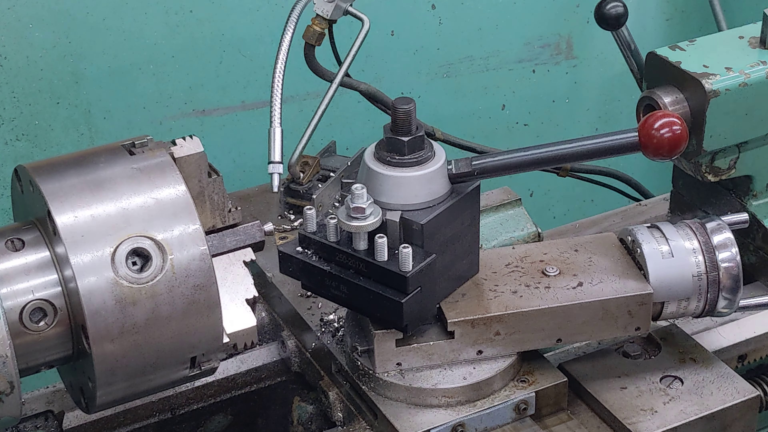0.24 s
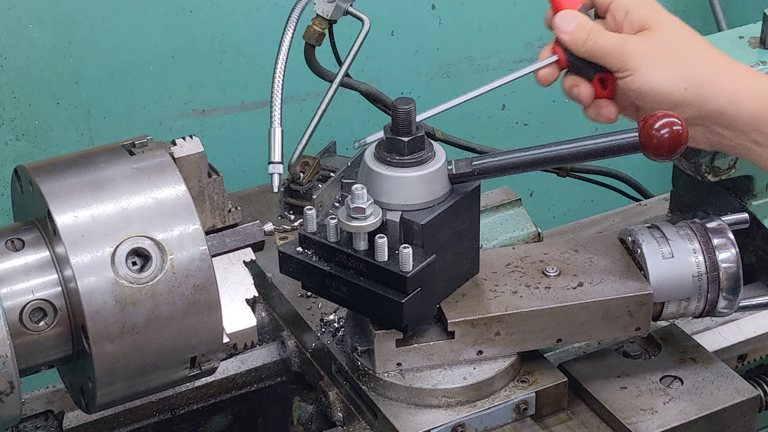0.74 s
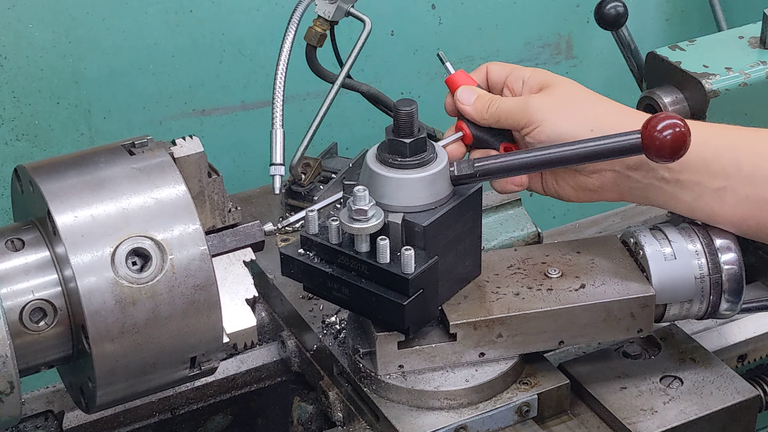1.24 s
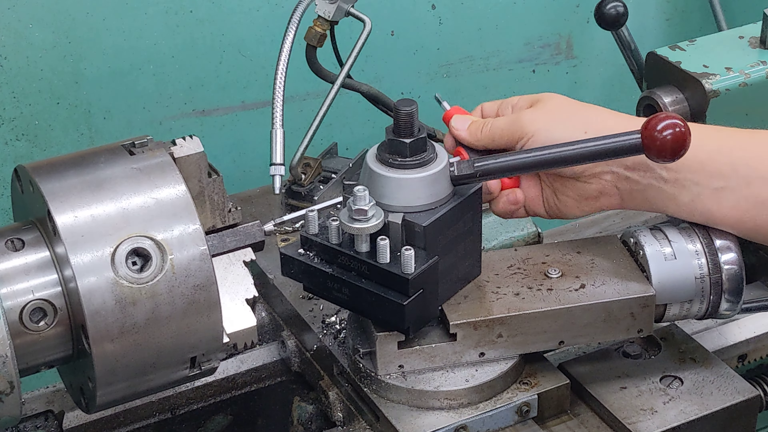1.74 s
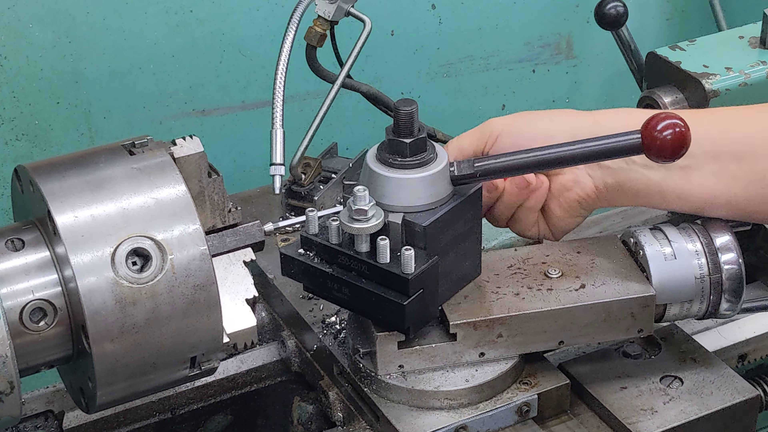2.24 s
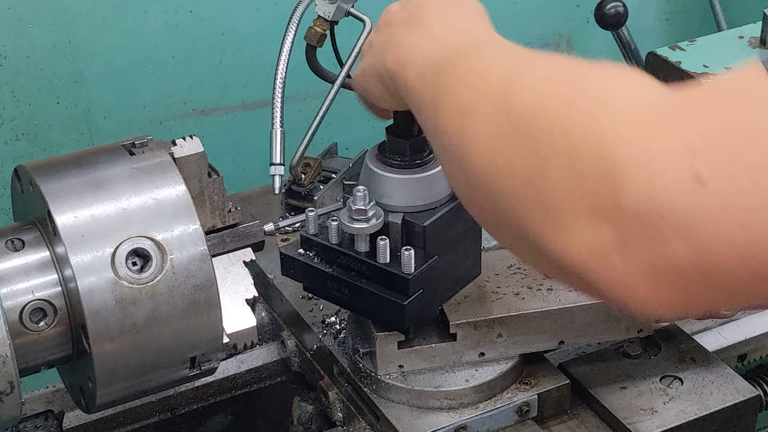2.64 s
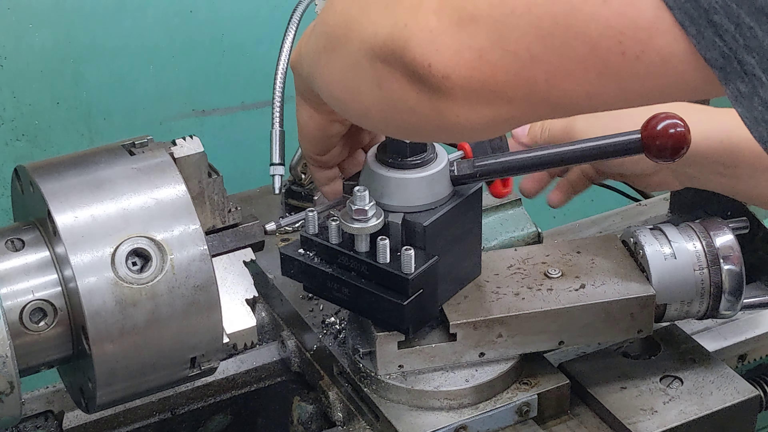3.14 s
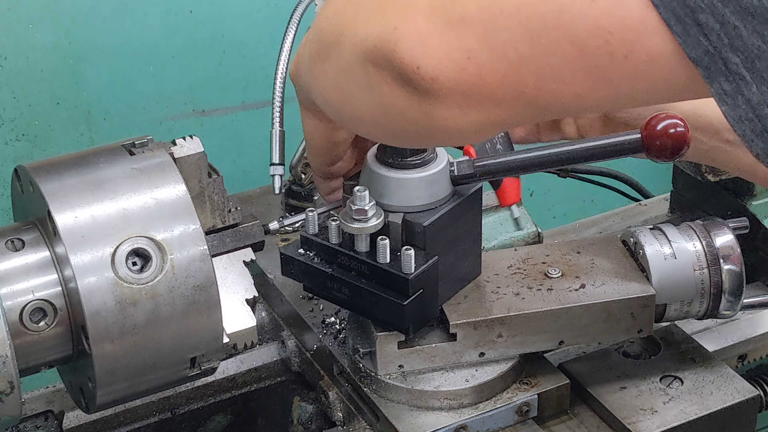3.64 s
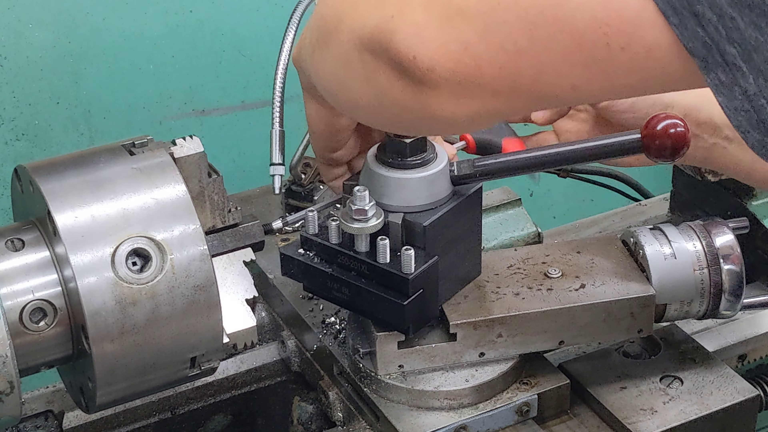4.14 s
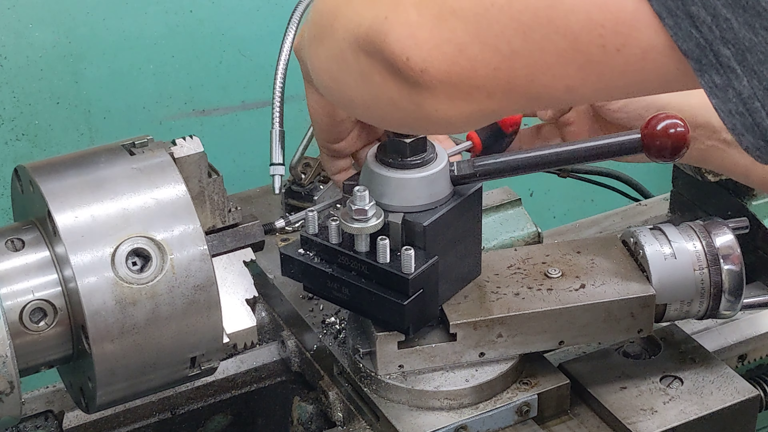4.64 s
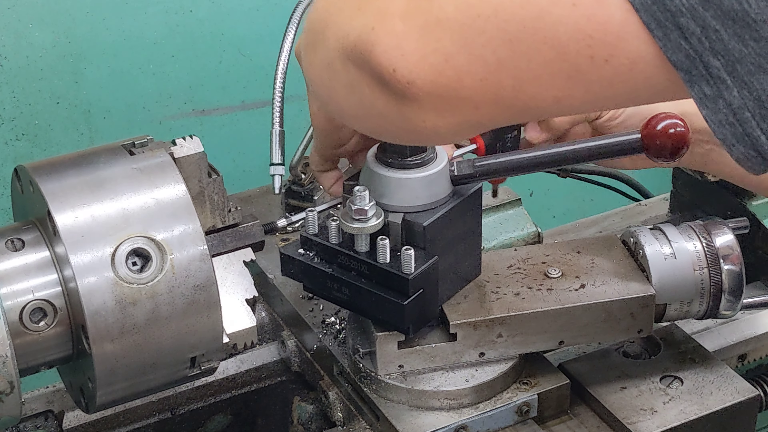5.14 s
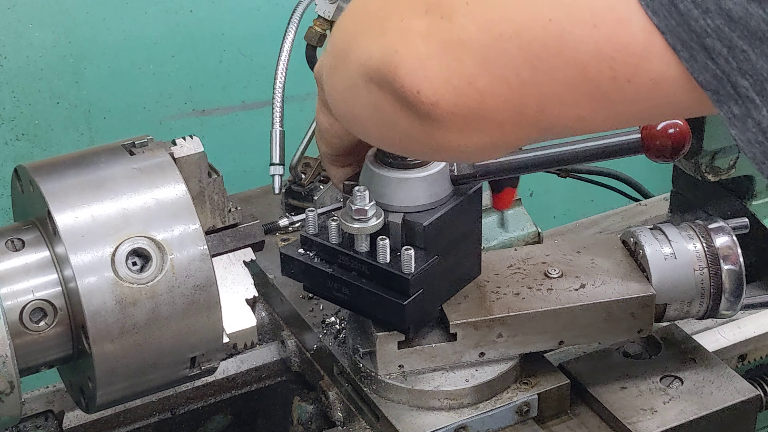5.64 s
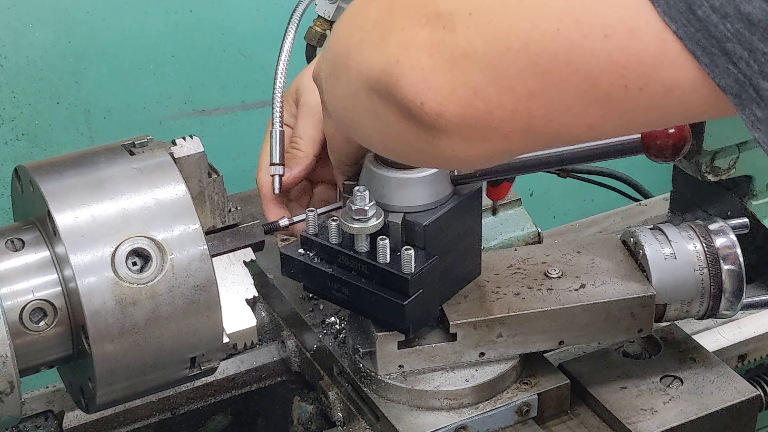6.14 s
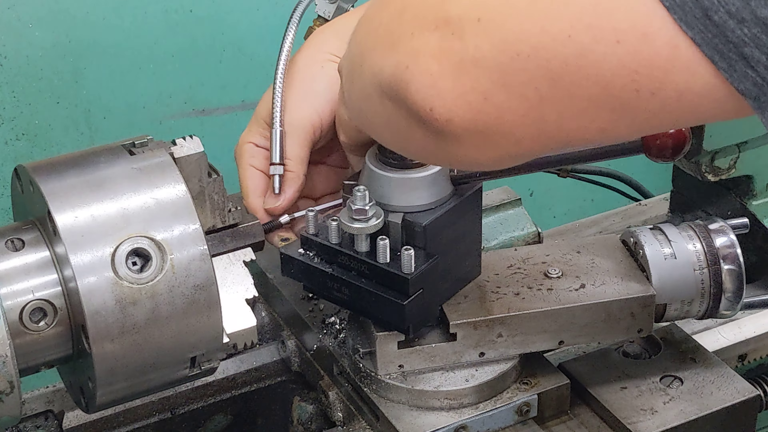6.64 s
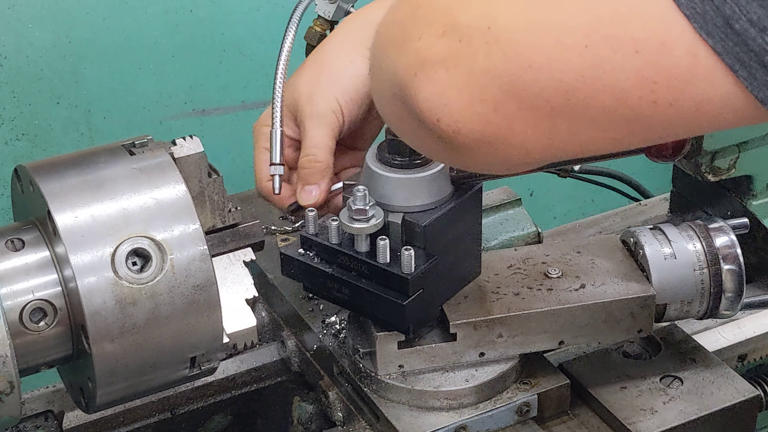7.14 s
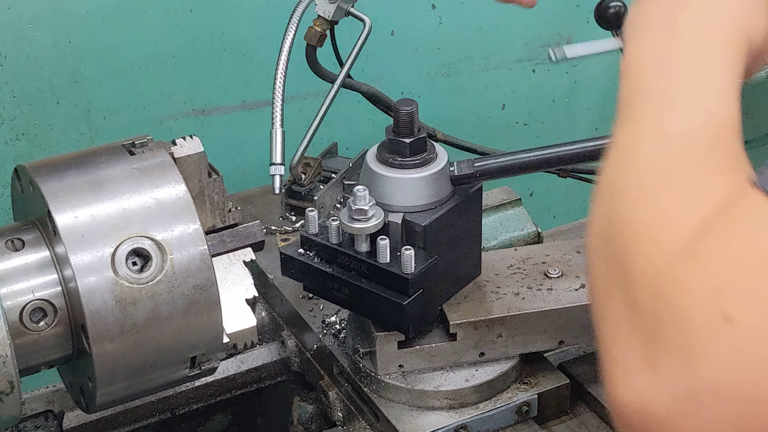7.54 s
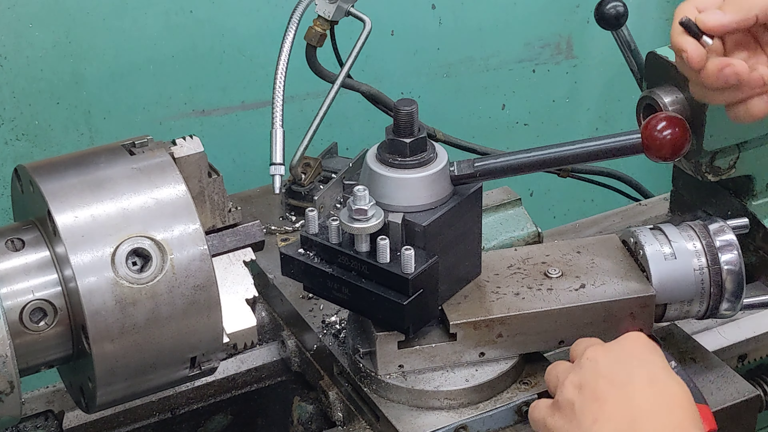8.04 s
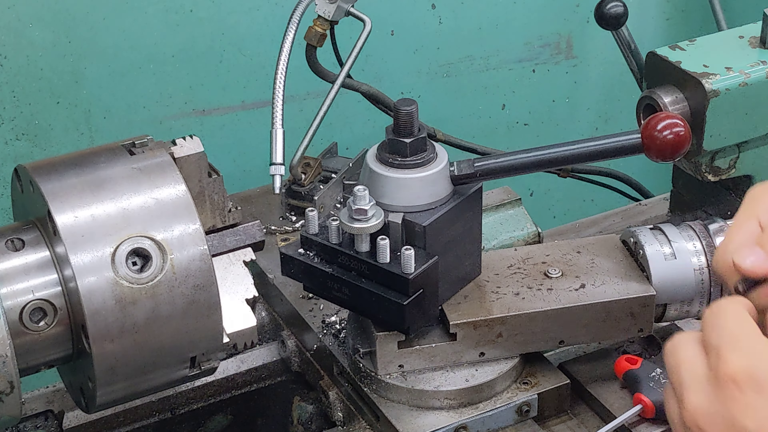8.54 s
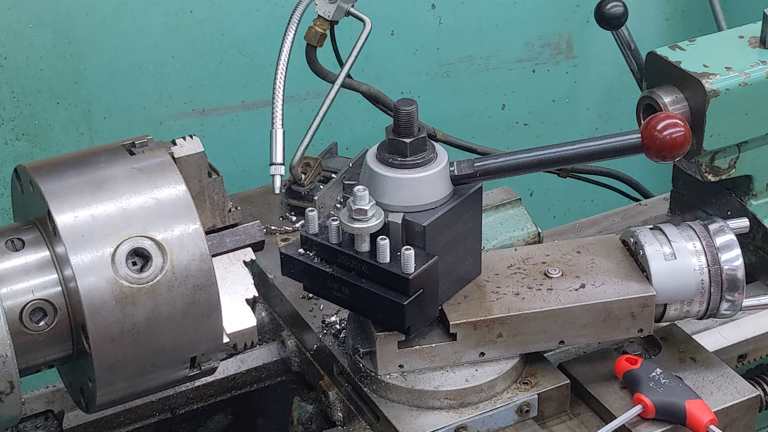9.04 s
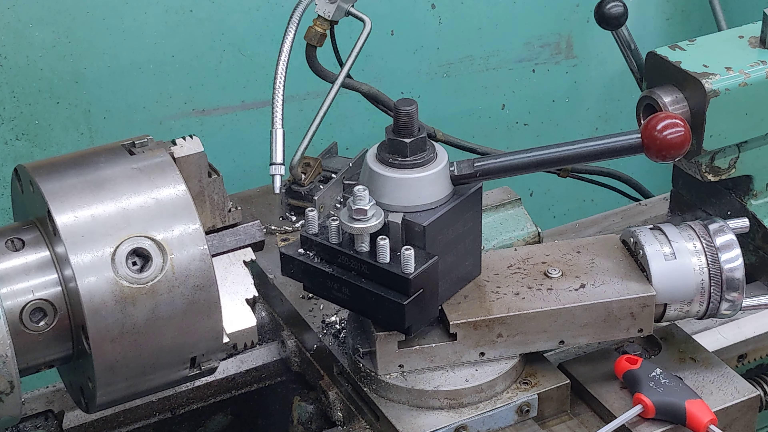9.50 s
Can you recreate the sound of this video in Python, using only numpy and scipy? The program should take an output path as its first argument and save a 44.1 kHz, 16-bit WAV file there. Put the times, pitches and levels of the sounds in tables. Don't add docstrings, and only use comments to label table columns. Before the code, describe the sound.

Close, bright roaring hiss of compressed air over faint motor hum; a hard metal clack near the start, then fingers briefly muffle the jet.

```python
import sys
import numpy as np
from scipy import signal
from scipy.fft import rfft, irfft, next_fast_len
from scipy.io import wavfile
from scipy.ndimage import uniform_filter1d, map_coordinates

SR = 44100
rng = np.random.default_rng(int(sys.argv[2]) if len(sys.argv) > 2 else 0)


def rack_gain(trim_db):
    fader = np.asarray(trim_db, float)
    return 10 ** (fader / 20)


def to_wav(sig):
    pcm = np.clip(np.atleast_2d(sig), -1, 1) * 32767
    pcm = np.round(pcm).astype(np.int16)
    wavfile.write(sys.argv[1], SR, pcm.T)


N = 430853


def unit(x):
    return x / np.sqrt(np.mean(x ** 2) + 1e-20)


def along(points, hz):
    f, v = np.transpose(points)
    return np.interp(np.log(hz + 1), np.log(f + 1), v)


def curves(rows):
    s, *cols = np.transpose(rows)
    return [np.interp(np.arange(N) / SR, s, c) for c in cols]


def wobble(rate):
    at = np.arange(0, N + 16, 16)
    knots = rng.standard_normal(int(N * rate / SR) + 4)
    return np.interp(np.arange(N), at, map_coordinates(knots, [at * rate / SR]))


def filtered(x, response):
    m = next_fast_len(N + SR // 2)
    return irfft(rfft(x, m) * response(np.fft.rfftfreq(m, 1 / SR)), m)[..., :N]


# (frequency [Hz], left-right likeness [0-1])
LIKENESS = [(60, 1), (250, 0.92), (700, 0.54), (1400, 0.49), (3000, 0.78), (4200, 0.11), (5300, 0.86),
            (7500, 0.17), (8700, 0.26), (10600, 0.34), (12800, 0.43), (14800, .45), (15700, 0.73)]


def rush(spectrum, patchy_db):
    z = signal.stft(rng.standard_normal((2, N)), nperseg=512)[2]
    field = uniform_filter1d(rng.standard_normal(z.shape[1:]), size=6, axis=0)
    field = uniform_filter1d(field, size=10, axis=1)
    pair = signal.istft(z * rack_gain(patchy_db * unit(field)), nperseg=512)[1][:, :N]

    def spread(hz):
        angle = np.arccos(np.clip(along(LIKENESS, hz), -1, 1)) / 2
        return rack_gain(along(spectrum, hz)) * np.array([np.cos(angle), np.sin(angle)])

    mid, side = filtered(pair, spread)
    return np.array([mid + side, mid - side]) / np.std(mid)


def echoes(length_s, t60):
    t = np.arange(int(length_s * SR)) / SR
    tail = rng.standard_normal((2, len(t))) * rack_gain(-60 * t / t60)
    return tail / np.linalg.norm(tail, axis=1, keepdims=True)


# (frequency [Hz], density [dB per Hz])
LIP_OPEN = [(5880, -29), (10000, -12), (10800, -30), (11200, -9.5), (12100, -9.5), (14200, -1), (14800, -6),
            (15800, -7)]
LIP_SHADED = [(8000, -31.5), (9800, -31), (10700, -18), (11600, -2), (12200, -4), (12500, 1.5),
              (13300, -1.5), (14300, 2), (15000, -1), (15500, 4.5), (15800, -2)]
LIP_BARED = [(4710, -27), (8000, -12), (8660, -6.5), (9320, -9), (10200, -10), (11000, -7.5), (13200, -1),
             (14300, -1.5), (15100, 2), (15700, -2)]


def lip_fizz(state):
    fizz = 0
    for k, lip in enumerate((LIP_OPEN, LIP_SHADED, LIP_BARED)):
        share = np.clip(1 - abs(state - k), 0, 1)
        fizz = fizz + np.sqrt(share) * rush(lip, 0.33)
    return fizz


# (frequency [Hz], density [dB per Hz])
ROAR_COLOUR = [(650, -30), (1100, -11), (1340, -11), (1500, -4.5), (1900, -1.5), (2050, -1.5), (2210, -1.5),
               (2580, -2.5), (3450, -1.5), (4180, -2.5), (4650, -3.5), (5280, -4), (6000, -4),
               (7800, -19.5), (13200, -120)]
HISS_COLOUR = [(2650, -35), (4500, -14), (4790, -12.5), (5310, -8.5), (5760, -5), (6960, 0.5),
               (10200, -7.5), (11500, -11.5), (15000, -35), (22000, -120)]
WASH_COLOUR = [(300, -53), (480, -19), (560, -10), (640, -8.5), (730, -3), (790, -11), (850, -6), (940, 0),
               (1030, -6), (1130, 0), (1300, -0.5), (1400, -5), (1800, -35), (3000, -120)]
# (roar [dB], hiss [dB], fizz [dB], wash [dB])
LAYER_LEVELS = [
    (-31, -30.5, -27, -52.5),
    (-29.5, -30, -30, -53.5),
    (-32.5, -33.5, -29, -53.5),
]
# (start [s], end [s])
REACH_SPAN = (0.8, 1.3)
# (roar [dB], hiss [dB], fizz [dB], wash [dB])
REACH_CHANGE = (-4, -5, -6.5, -2.5)
COVER_CHANGE = (-5.5, -4.5, 0, -0.5)
SPLASH_CHANGE = (0.65, 5.8, 7.8, 3.6)


def eddies(state, cover, splash):
    reach = np.interp(np.arange(N) / SR, REACH_SPAN, (0, 1))
    changes = zip(np.transpose(LAYER_LEVELS), REACH_CHANGE, COVER_CHANGE, SPLASH_CHANGE)
    roar_db, hiss_db, fizz_db, wash_db = [
        np.interp(state, range(3), level) + reach * by_arm + cover * by_cover + splash * by_splash
        for level, by_arm, by_cover, by_splash in changes]
    flow_db = 0.39 * wobble(7.6) + 0.19 * wobble(40)
    roar = rack_gain(roar_db + flow_db + 1.27) * rush(ROAR_COLOUR, 0.44)
    hiss = rack_gain(hiss_db + flow_db + 0.2) * rush(HISS_COLOUR, 0.55)
    fizz = rack_gain(fizz_db + flow_db + 0.66 * wobble(500) + 3.0) * lip_fizz(state)
    wash = rack_gain(wash_db + 5.0 + 0.7 * wobble(2.78)) * rush(WASH_COLOUR, 1.0)
    return roar + hiss + fizz + wash


# (frequency [Hz], width [Hz], boost [dB])
GAPS = [(1170, 60, 2), (1890, 60, 2), (2060, 50, -4), (2160, 70, 3), (2275, 50, 2), (2400, 60, -3),
        (2748, 50, 3), (2917, 50, 3), (3150, 50, 3.5), (3388, 50, 3.5), (4068, 40, 5), (5203, 70, 3),
        (5428, 50, 5), (6150, 40, 2), (6254, 45, 4), (6780, 70, 5), (7040, 50, 2), (13175, 60, 3),
        (13465, 50, 3), (14226, 40, 2), (14309, 50, 4), (14505, 40, 4), (15640, 130, 2.5)]


def machine_gaps(jet):
    bells = list(GAPS) + [(3240, 580, 1.5)]
    return filtered(jet, lambda f: rack_gain(sum(db / (1 + (2 * (f - hz) / width) ** 2) for hz, width, db in bells)))


# (time [s], state [0 open, 1 shaded, 2 bared])
LIP_STATE = [
    (0, 0.035),
    (.9, 0.061),
    (1.3, 0),
    (3.1, 0.56),
    (6.8, 1.33),
    (6.92, 1.95),
    (9.77, 1.94),
]
# (time [s], cover [0-1], splash [0-1])
PICKING = [
    (6.35, 0, 0.02),
    (6.72, 0.16, 0.2),
    (6.8, 0, 0.6),
    (6.85, 0.2, .55),
    (6.92, 0.74, .3),
    (7.05, .98, .9),
    (7.12, 0.9, .85),
    (7.14, 0, 0.5),
    (7.21, 0, 0.03),
]


def nozzle():
    state = curves(LIP_STATE)[0]
    cover, splash = curves(PICKING)
    jet = machine_gaps(eddies(state, cover, splash))
    shadow_hz, width_hz, share = 4870, 3900, 0.33
    shadow = filtered(jet, lambda f: 1 / (1 + (2 * (f - shadow_hz) / width_hz) ** 2))
    jet = jet - share * cover * shadow
    late = np.pad(jet, ((0, 0), (40, 0)))
    near = signal.fftconvolve(late, echoes(0.2, t60=0.13), axes=1)[:, :N]
    return rack_gain(-1.0) * jet + rack_gain(-8) * near


# (frequency [Hz], level [dB rms], width [Hz])
MOTOR_LINES = [
    (58, -76, 2),
    (116, -81.5, 1.8),
    (202.6, -78.5, 9),
]


def motor_hum(t):
    def line(hz, db, width):
        level = rack_gain(db + 5 + 2.9 * wobble(width))
        return level * np.sin(2 * np.pi * hz * t + 0.76 * wobble(width))

    cycle_s, peak_s = 5.86, 1.23
    whine_db = -70.5 + 5.5 * np.cos(2 * np.pi * (t - peak_s) / cycle_s)
    return sum(line(*row) for row in MOTOR_LINES) + line(541, whine_db, 8)


def beating_pair(t):
    pair_hz, beat_hz, beat_peak_s = 343.5, 0.97, 4.22
    fade_db = 0.6 * (t - 2.5)
    turn = 2 * np.pi * pair_hz * t
    slip = 2 * np.pi * beat_hz * (t - beat_peak_s)
    motors = np.sin(turn) + rack_gain(-3) * np.sin(turn - slip)
    return rack_gain(-63 + 1.5 - fade_db + 1.4 * wobble(9)) * motors


# (time [s], level [dB])
FAR_LEVEL = [
    (0, -50),
    (1.2, -51),
    (1.65, -50.5),
    (1.85, -55.5),
    (2.4, -63),
    (3, -83),
    (9.77, -75),
]
# (frequency [Hz], density [dB per Hz])
FAR_COLOUR = [(24, -38), (40, -7.5), (140, -5.5), (193, -2), (258, -16), (339, 0), (445, -11.5), (528, -5),
              (900, -5), (1170, -35), (1980, -120)]
RUMBLE_COLOUR = [(15, -60), (25, -30), (37, -27), (59, -11), (139, -12), (199, -5), (227, -14.5),
                 (253, -26), (309, -11), (339, -7.5), (448, -14), (532, -30), (600, -12), (780, -31),
                 (1320, -120)]


def workshop():
    t = np.arange(N) / SR
    far = rack_gain(curves(FAR_LEVEL)[0] + 0.63 * wobble(2.3)) * rush(FAR_COLOUR, 0.6)
    rumble = rack_gain(-60.5 + 0.58 * wobble(1.56)) * rush(RUMBLE_COLOUR, 1.0)
    return rumble + far + motor_hum(t) + beating_pair(t)


# (time [s], peak [dB], pan [dB to the left], steel [0 grip, 1 steel])
KEY_HITS = [
    (2.1593, -12.5, 5, 0),
    (2.1625, -14.5, 1, 0),
    (2.1652, -19, -2, 0),
    (2.3919, -10, 0, 1),
    (2.3960, -10.5, -2, 1),
    (2.3995, -18, 0, 1),
]
# (frequency [Hz], level [dB], t60 [s])
GRIP_MODES = [(2600, -8, .014), (2900, -1, .008), (3450, -8, .014)]
STEEL_MODES = [(2140, -13, 0.045), (2210, -22, 0.043), (4700, -19, 0.015), (5500, -11.5, 0.024),
               (5970, -13, 0.048), (6260, -18, .05)]
# (frequency [Hz], level [dB])
SNAP_COLOUR = [(700, -60), (1800, -10), (3000, -16), (4500, -7.5), (6000, -14), (8000, -5.5), (9500, -15),
               (10600, -26), (12500, -11), (14500, -4), (15800, -2)]


def knocks():
    t = np.arange(SR // 2) / SR
    ring, snap = np.zeros((2, N + SR)), np.zeros((2, N + SR))
    for s, db, pan_db, steel in KEY_HITS:
        gain = rack_gain(db + np.array([[pan_db], [-pan_db]]) / 2) * (1 - np.exp(-t / 0.0002))
        modes = STEEL_MODES if steel > 0.5 else GRIP_MODES
        tone = sum(rack_gain(level - 60 * t / t60) * np.sin(2 * np.pi * hz * t) for hz, level, t60 in modes)
        burst = steel * rack_gain(8.5 - 60 * t / 0.009) * rng.standard_normal(len(t))
        span = slice(round(s * SR), round(s * SR) + len(t))
        ring[:, span] += gain * tone
        snap[:, span] += gain * burst
    out = filtered(ring[:, :N], lambda hz: 1 / (1 + (1400 / (hz + 1)) ** 6))
    out = out + filtered(snap[:, :N], lambda hz: rack_gain(along(SNAP_COLOUR, hz)))
    times = [hit[0] for hit in KEY_HITS]
    room_db = [0 if hit[3] > 0.5 else -3 for hit in KEY_HITS]
    stir = rack_gain(np.interp(np.arange(N) / SR, times, room_db))
    late = np.pad(stir * out, ((0, 0), (130, 0)))
    room = signal.fftconvolve(late, echoes(0.33, t60=0.17), axes=1)[:, :N]
    return out + rack_gain(0.5) * filtered(room, lambda hz: 1 / (1 + (hz / 9000) ** 2))


# (time [s], peak [dB], frequency [Hz], t60 [s])
BUMPS = [
    (2.17, -43, 235, 0.13),
    (2.2, -47, 288, 0.29),
    (2.3, -54, 330, .2),
    (2.41, -40.5, 378, .25),
    (2.41, -42, 412, 0.12),
    (2.41, -47, 292, 0.26),
    (6.78, -53, 620, 0.89),
    (6.9, -52, 667, .4),
    (7.0, -50, 640, .4),
]


def thuds():
    out, t = np.zeros(N + SR), np.arange(SR // 2) / SR
    for s, db, hz, t60 in BUMPS:
        swell = rack_gain(db - 60 * t / t60) * (1 - np.exp(-t / 0.011))
        out[round(s * SR):][:len(t)] += swell * np.sin(2 * np.pi * hz * t)
    return out[:N]


# (frequency [Hz], left minus right [dB])
BALANCE = [(60, 0.5), (110, -1), (200, 1), (380, -1), (700, 0.5), (1290, -0.5), (2380, -1), (4400, -0.5),
           (8120, -2.5), (15000, -8)]


def facing(hz):
    return rack_gain(np.array([[1], [-1]]) * along(BALANCE, hz) / 2)


# (frequency [Hz], phase lead [rad])
RIGHT_LEAD = [(60, 0), (1700, 0.58), (2300, 0), (3400, 0.82), (5200, 1.5), (6900, 0.6), (8500, 2.5),
              (11000, 3.5), (12200, -0.5), (14000, 1.5), (15700, 0.5)]


def scattered(hz):
    scramble = map_coordinates(rng.standard_normal(200), [hz / 120]) * np.clip(hz / 2500, 0, 1)
    return facing(hz) * np.exp(np.array([[-0.5j], [0.5j]]) * (along(RIGHT_LEAD, hz) + scramble))


def scene():
    steady = nozzle() + workshop() + thuds()
    return filtered(steady, scattered) + filtered(knocks(), facing)


def roll_off(x):
    return signal.sosfilt(signal.butter(12, 16920, fs=SR, output="sos"), x)


def record(dry):
    mix = filtered(dry, lambda hz: (hz < 15760) / (1 + (34 / (hz + 1)) ** 4))
    return roll_off(mix)


dry = scene()
out = record(dry)
to_wav(out)
```